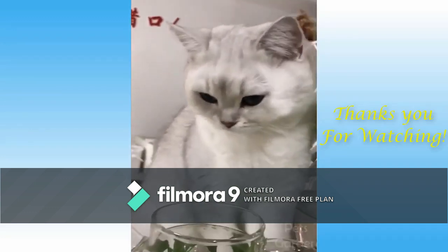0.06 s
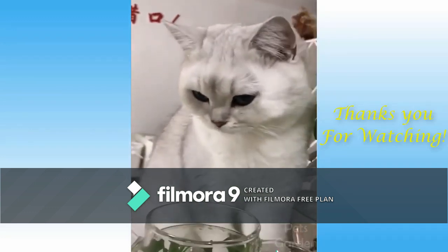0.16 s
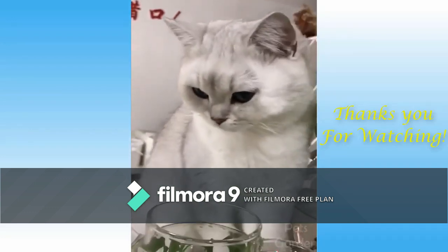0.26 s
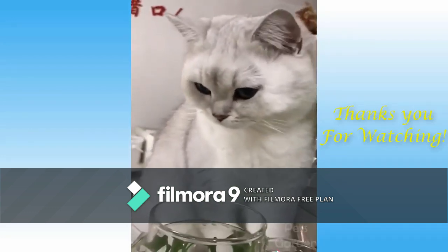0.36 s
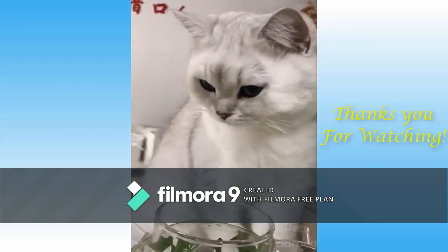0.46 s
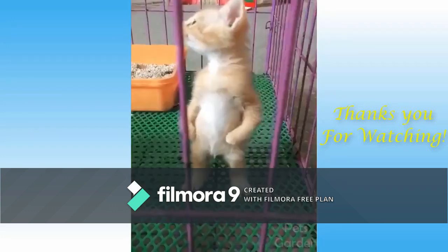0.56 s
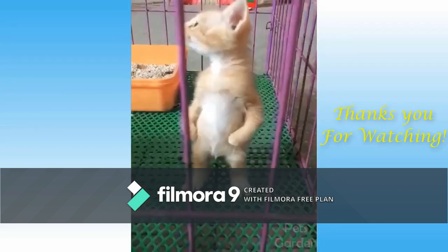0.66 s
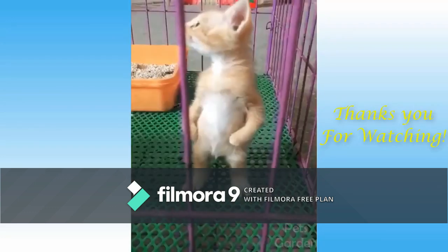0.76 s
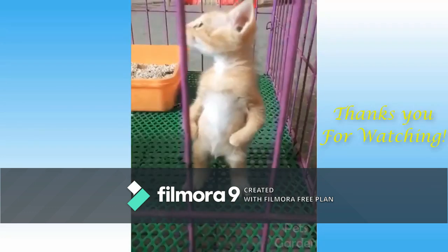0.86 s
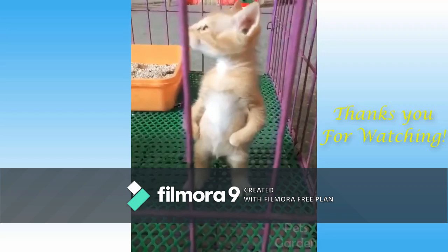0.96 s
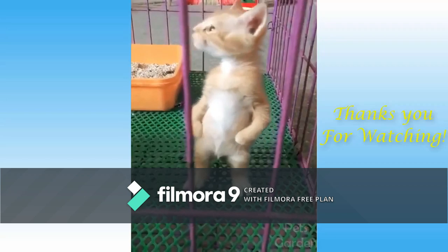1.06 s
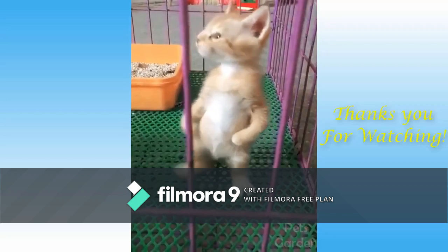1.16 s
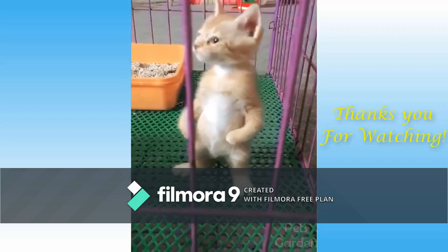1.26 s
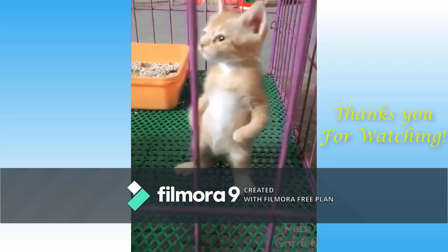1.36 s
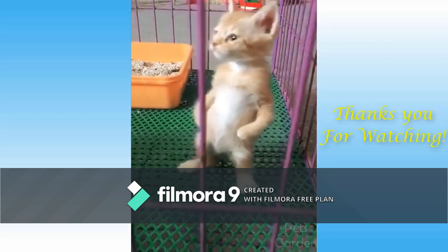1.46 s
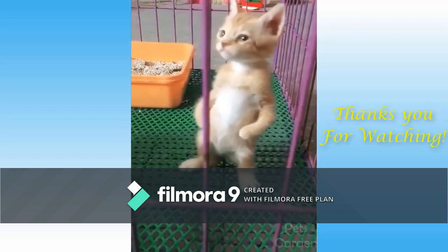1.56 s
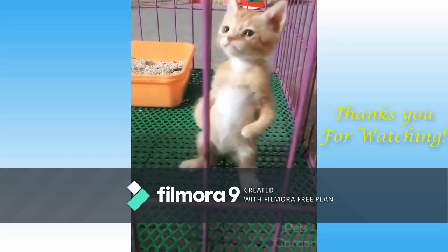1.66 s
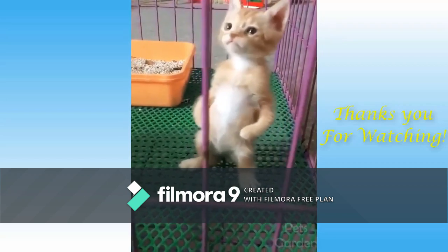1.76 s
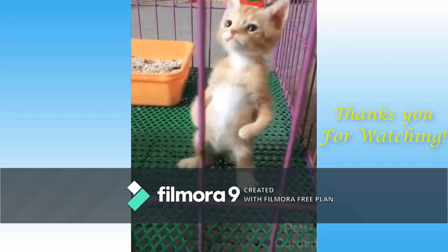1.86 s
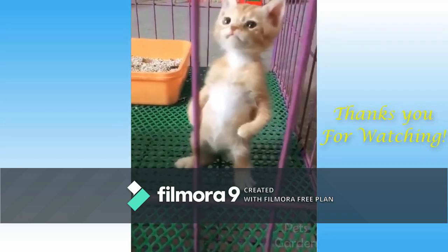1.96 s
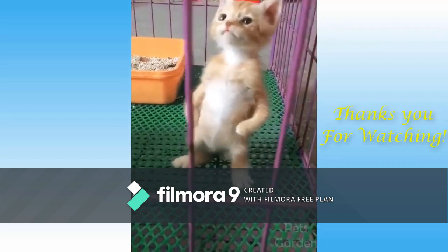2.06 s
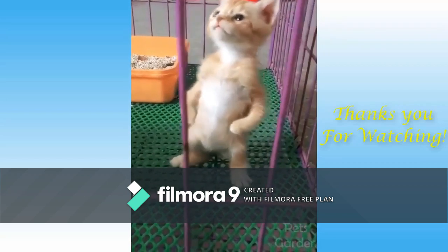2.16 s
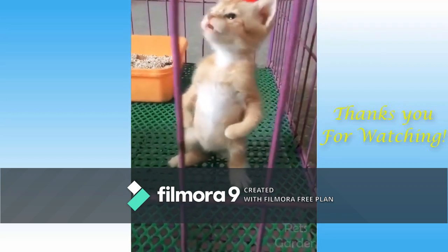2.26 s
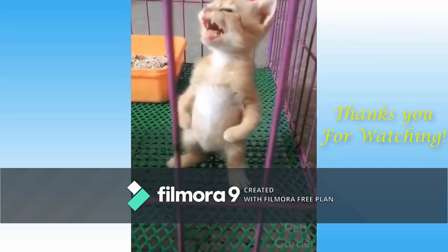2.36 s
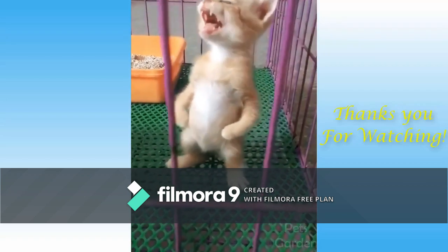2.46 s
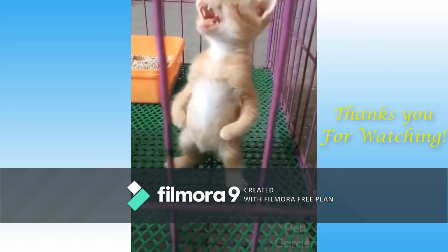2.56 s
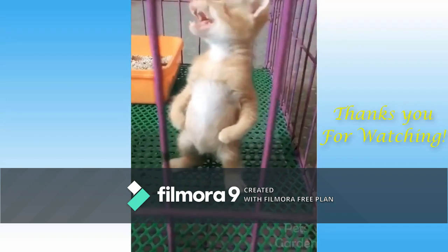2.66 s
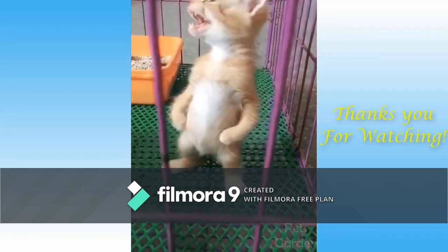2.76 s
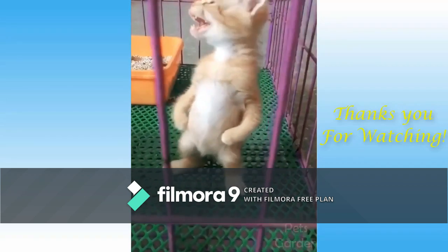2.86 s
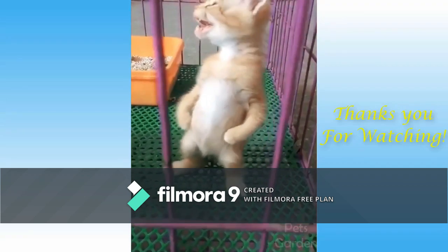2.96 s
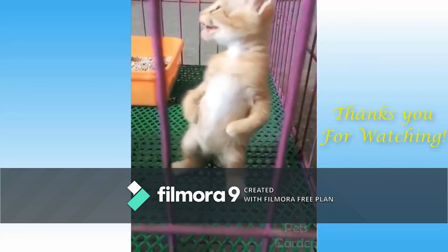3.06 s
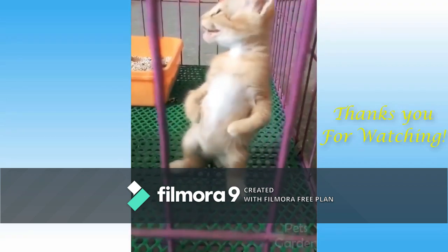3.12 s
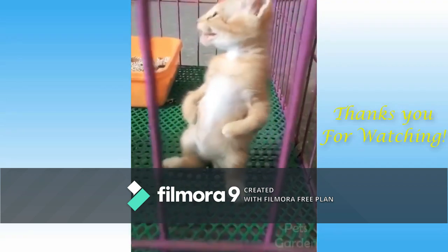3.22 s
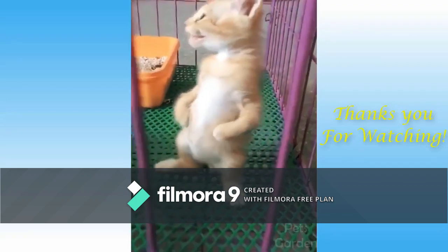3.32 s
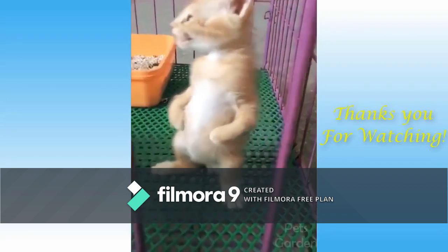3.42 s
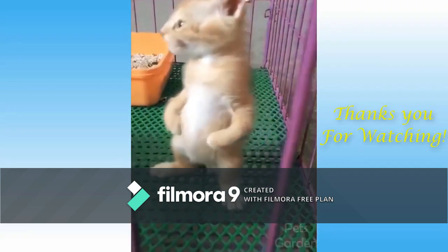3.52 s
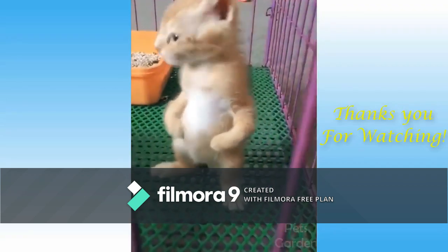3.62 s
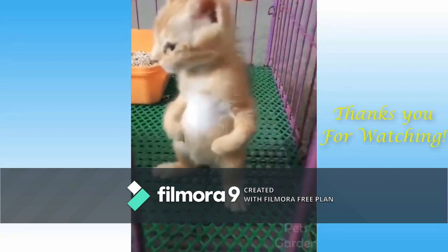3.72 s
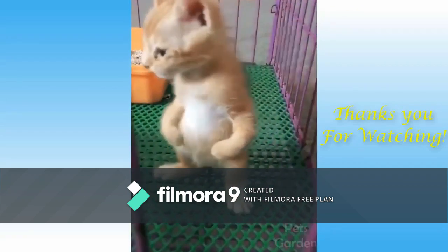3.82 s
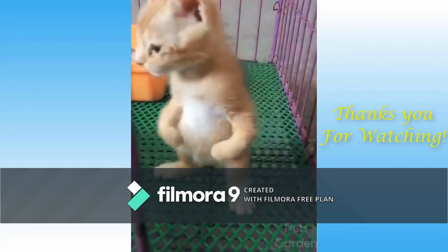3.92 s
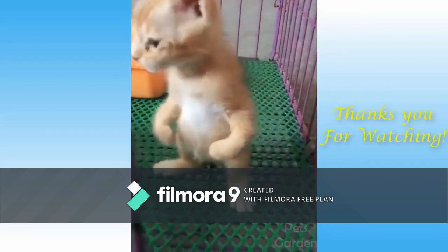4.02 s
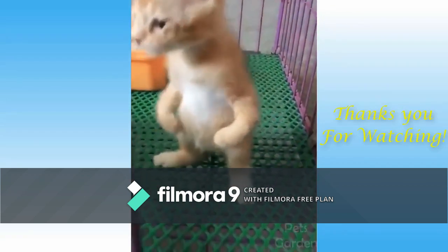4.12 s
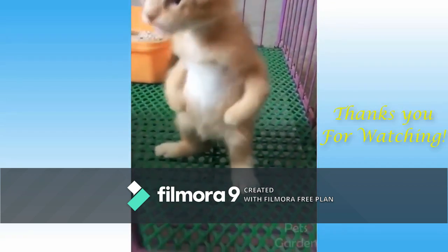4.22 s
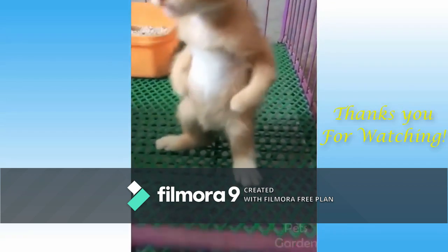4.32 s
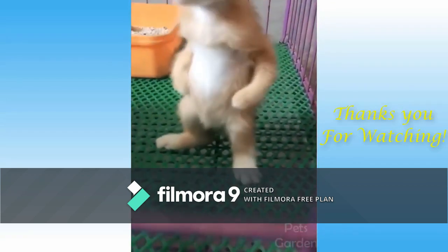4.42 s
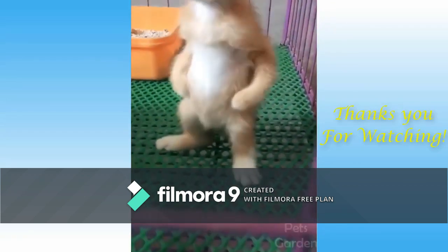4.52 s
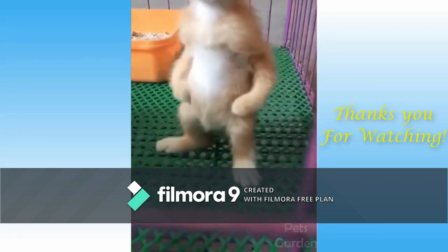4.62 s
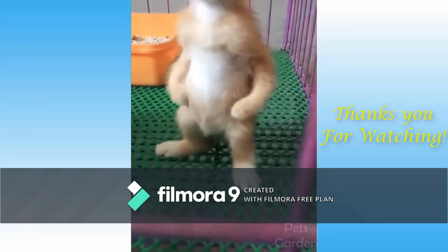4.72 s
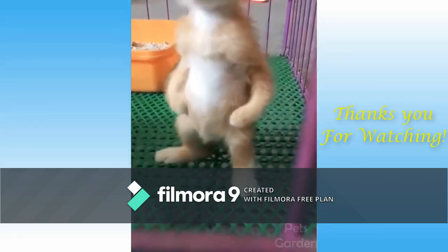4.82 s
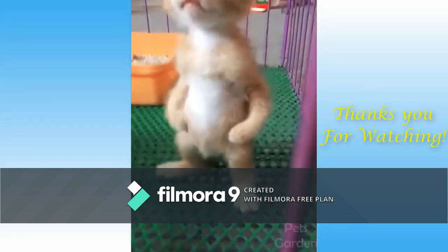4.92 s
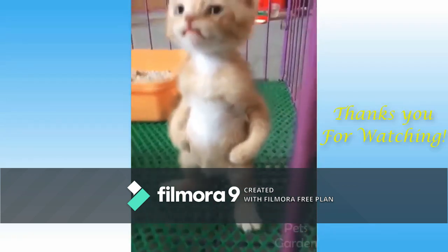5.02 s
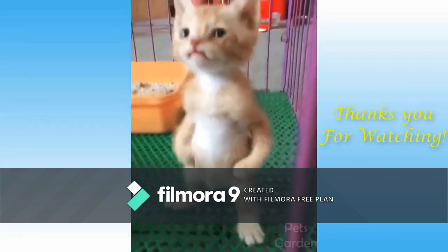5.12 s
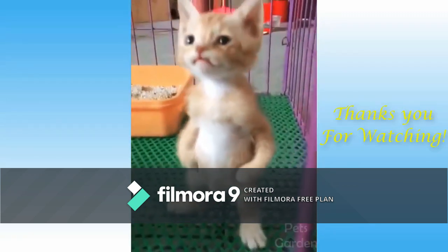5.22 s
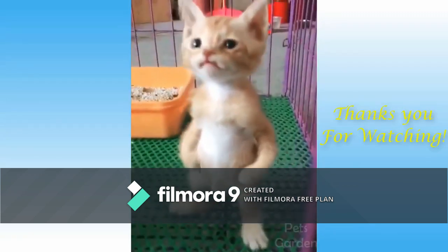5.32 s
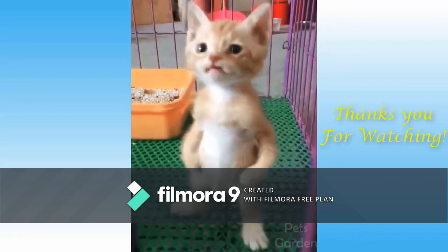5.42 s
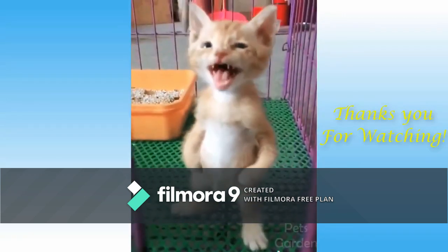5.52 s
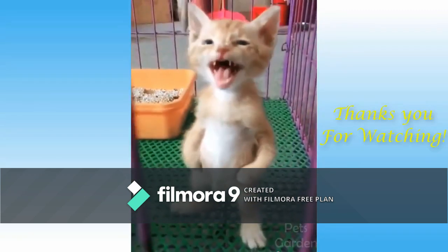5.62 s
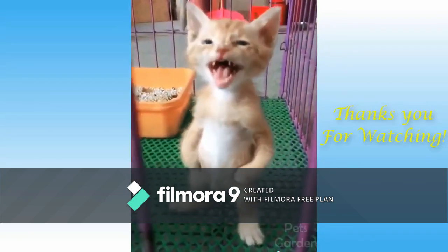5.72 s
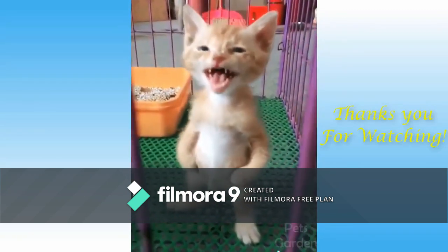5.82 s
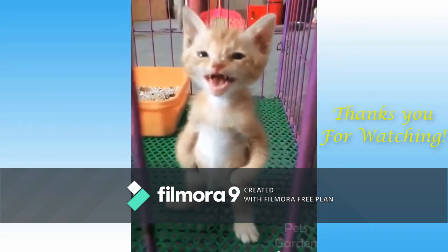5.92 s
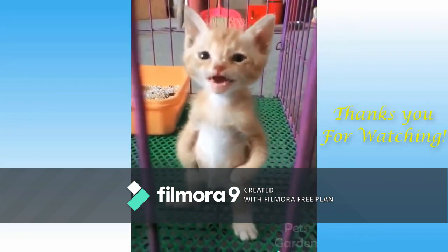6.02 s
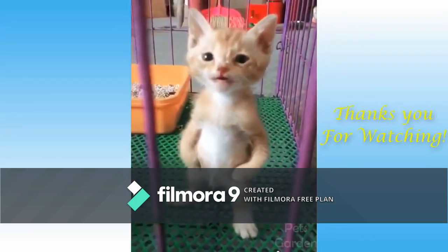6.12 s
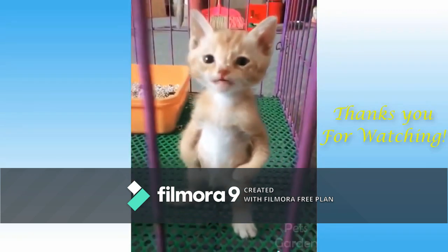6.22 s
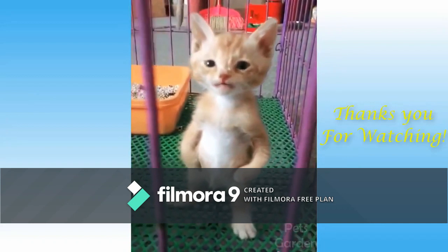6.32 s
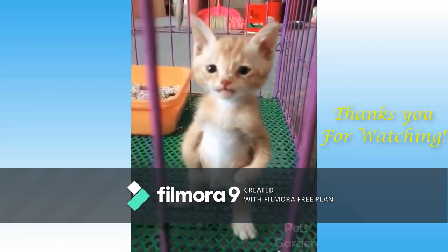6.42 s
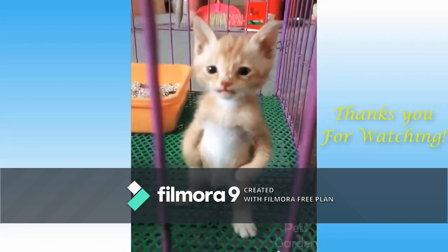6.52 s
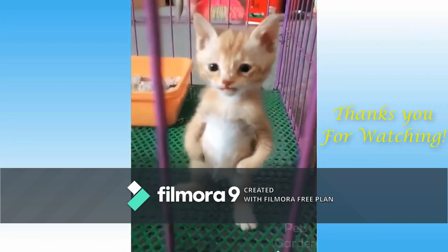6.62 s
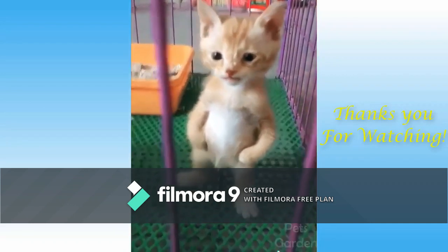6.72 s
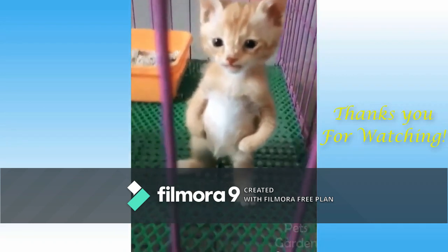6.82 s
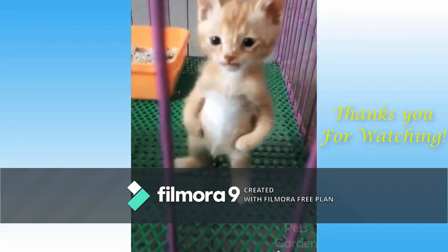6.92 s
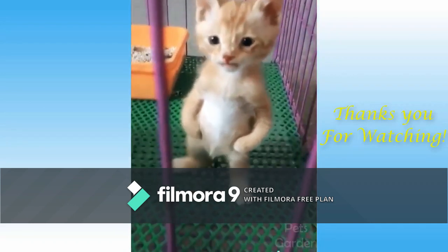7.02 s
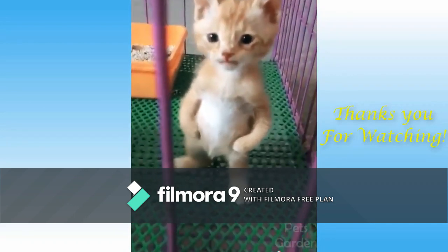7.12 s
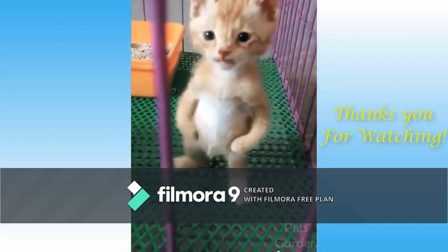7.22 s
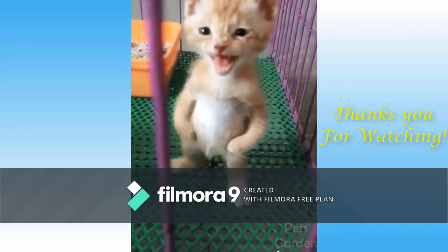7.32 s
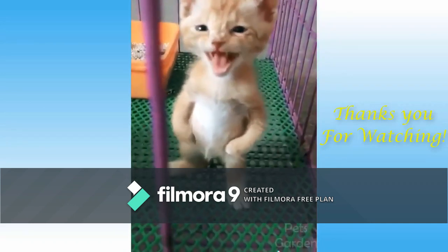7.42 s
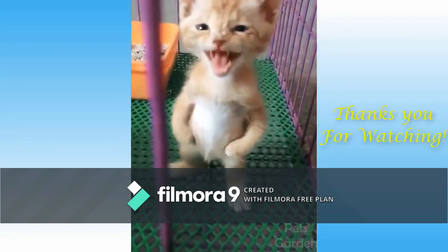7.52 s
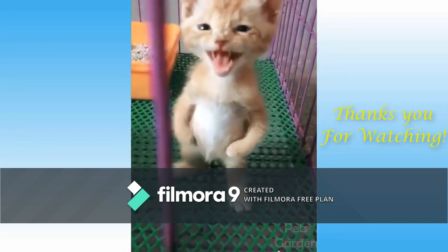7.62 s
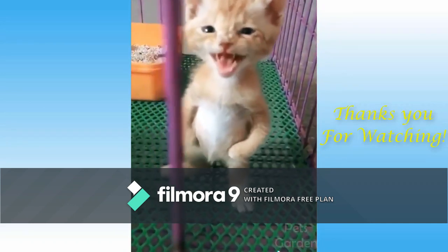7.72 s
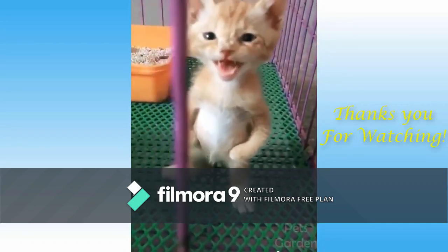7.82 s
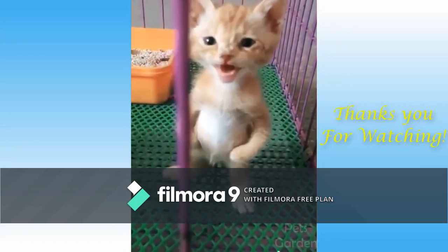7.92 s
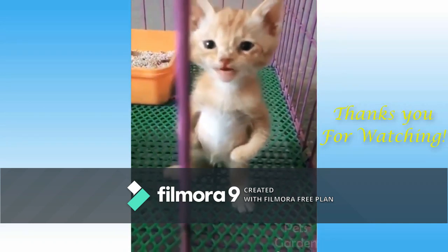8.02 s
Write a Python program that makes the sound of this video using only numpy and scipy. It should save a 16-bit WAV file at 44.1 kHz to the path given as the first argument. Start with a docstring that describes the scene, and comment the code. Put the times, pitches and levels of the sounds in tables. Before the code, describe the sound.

Close, fairly dry indoor sound, the same in both channels. After an opening gap of silence, machines hum and rumble low without stopping. A tiny kitten cries three times, thin and piercing: first a long falling meow, later two short, louder, raspier ones well apart. Barely audible paw scuffs and a tiny tick on a plastic mat fill the pauses.

```python
"""A room with a wire cage, mono microphone close to it: silence, then an abrupt opening onto three kitten meows.
Machines, perhaps fans, hum and rumble steadily: wandering tones over shaped noise.
Paws scuff softly on a plastic mat: short bells of grainy noise.
Each meow is an arch of pitch whose harmonics pass mouth and throat resonances, ringing near 4 kHz
while the mouth is wide; shaped noise makes it husky at its ends."""
import sys
import numpy as np
from scipy import signal
from scipy.fft import rfft, irfft
from scipy.io import wavfile
from scipy.ndimage import uniform_filter1d

SR = 44100
rng = np.random.default_rng(int(sys.argv[2]) if len(sys.argv) > 2 else 0)


def persist_wave(psi):
    """Save psi, clipped to +-1, as 16-bit WAV."""
    counts = np.round(np.clip(psi, -1, 1) * 32767).astype(np.int16)
    wavfile.write(sys.argv[1], SR, np.atleast_2d(counts).T)


N = 356019
TIME = np.arange(N) / SR
FREQS = np.fft.rfftfreq(N, 1 / SR)


def amp(db):
    """Decibels to gain."""
    return 10 ** (np.asarray(db) / 20)


def unit(x):
    """Scales to rms 1."""
    return x / np.sqrt(np.mean(x ** 2) + 1e-20)


def read_spectrum(points, hz):
    """A spectrum table joined by lines on a log-frequency axis."""
    point_hz, level_db = np.transpose(points)
    return np.interp(np.log(hz + 1), np.log(point_hz + 1), level_db)


def noise(spectrum_db):
    """Noise of rms 1 with the given spectrum."""
    white = rng.standard_normal(N)
    return unit(irfft(rfft(white) * amp(spectrum_db), N))


def drift(hz):
    """A random wander of rms 1, mostly slower than hz."""
    return noise(-10 * np.log10(1 + (FREQS / hz) ** 4))


def resonance(hz, centre_hz, width_hz):
    """Gain of a resonance, 1 at its centre and half at the edges of its width."""
    return 1 / (1 + ((hz - centre_hz) / width_hz * 2) ** 2)


def bell(t, centre_s, length_s):
    """A soft bump of height 1."""
    return np.exp(-2 * ((t - centre_s) / length_s) ** 2)


def bursts(rows):
    """Gain curve made of one soft bell a row."""
    return sum(amp(level_db) * bell(TIME, centre_s, length_s) for centre_s, length_s, level_db in rows)


# Relative colour of the room's rumble and air noise: frequency_hz, density_db [dB per Hz]
RUMBLE_SPECTRUM = [(30, -39), (40, 4.5), (60, 4.5), (130, -6.5), (160, 1), (270, -13), (430, -17.5),
                   (830, -18.5), (1100, -19.5), (2500, -38.5), (5000, -53), (9200, -57.5), (11600, -64.5),
                   (12800, -68)]
# Broad bumps and dips the room puts on that noise: centre_hz, width_hz, change_db
ROOM_BUMPS = [(15, 18, -16), (105.5, 41, 4.5), (185, 35, -1.5), (330, 73, 4), (1110, 230, 0),
              (3830, 500, 2)]
RUMBLE_DB = -28


def rumble(swell_db=0.96):
    """Low air noise of the room, coloured by broad bumps and swelling faintly."""
    bumps_db = sum(db * resonance(FREQS, centre, width) for centre, width, db in ROOM_BUMPS)
    colour_db = read_spectrum(RUMBLE_SPECTRUM, FREQS) + bumps_db
    return amp(RUMBLE_DB + swell_db * drift(hz=1.3)) * noise(colour_db)


# Steady motor tones, close neighbours beating together: frequency_hz, level_db [rms, before hum_db]
MOTOR_TONES = [(44.5, -43.7), (69.1, -40.7), (71.7, -41.1), (76.3, -35.4), (95.2, -34.8), (110.1, -39.1),
               (124.8, -49.0), (139.7, -48.7), (151.6, -41.1), (163.7, -43.2), (168.6, -35.5),
               (172.2, -37.7), (175.9, -37.6), (196.8, -47.4), (237.9, -44.6), (300.0, -50.5),
               (314.8, -49.9), (325.6, -52.4), (327.3, -49.0), (332.7, -49.7), (344.4, -44.9),
               (352.8, -55.6), (402.8, -55.0), (419.0, -55.6), (472.3, -56.5), (488.4, -60.0),
               (763.3, -57.3), (778.8, -51.1)]


def motors(hum_db=0.18, wander_rad=0.58):
    """Motor tones, each a sine wandering a little in phase."""
    hum = np.zeros(N)
    knots = np.linspace(0, TIME[-1], num=12)
    for hz, level_db in MOTOR_TONES:
        sway = wander_rad * np.interp(TIME, knots, rng.standard_normal(len(knots)))
        start_turn = rng.random()
        hum += np.sqrt(2) * amp(level_db) * np.cos(2 * np.pi * (hz * TIME + start_turn) + sway)
    return amp(hum_db) * hum


# Soft scuffs of paws on the plastic mat: centre_s, length_s, level_db
PAW_SCUFFS = [(1.05, 0.043, -64), (1.3, 0.051, -64), (2.18, .16, -72), (3.823, 0.009, -52),
              (4.795, 0.0072, -60), (5.0, 0.049, -64)]
# Relative colour of the scuffs: frequency_hz, density_db [dB per Hz]
MAT_SPECTRUM = [(1000, -29), (2800, 0), (3900, 11), (5000, 6), (6500, -1), (9000, -3), (12000, -8),
                (13000, -38)]


def paws():
    """Scuffs on the mat, noise made grainy by fast random changes of level."""
    grain = amp(3 * drift(hz=200))
    scuffing = unit(noise(read_spectrum(MAT_SPECTRUM, FREQS)) * grain)
    return bursts(PAW_SCUFFS) * scuffing


# Reflections from walls and floor near the cage: delay_s, gain [linear, signed]
NEAR_ECHOES = [(.0023, 0.012), (.0061, -0.1), (0.0085, .06)]
ROOM_T60_S = .3


def room(x, wet_db=-19):
    """A few near reflections and a faint short tail of decaying noise."""
    t = TIME[:SR // 2]
    tail = rng.standard_normal(len(t)) * amp(-60 * t / ROOM_T60_S) * (t > .008)
    response = amp(wet_db) * unit(tail) / np.sqrt(len(t))
    response[0] = 1  # direct sound
    for delay_s, gain in NEAR_ECHOES:
        response[round(delay_s * SR)] += gain
    return signal.fftconvolve(x, response)[:N]


# a fixed hollow in the voice
HOLLOW_HZ, HOLLOW_WIDTH_HZ, HOLLOW_DB = 3428, 380, -5.5
MOUTH_WIDTH_HZ, MOUTH_TOP_HZ = 716, 4500


def mouth_gain(harmonic_hz, mouth_hz):
    """The mouth resonance, hollowed near 3.4 kHz; an overtone flares as it crosses it."""
    hollow = amp(HOLLOW_DB * resonance(harmonic_hz, HOLLOW_HZ, HOLLOW_WIDTH_HZ))
    mouth = resonance(harmonic_hz, mouth_hz, MOUTH_WIDTH_HZ) * hollow
    return mouth / (1 + (harmonic_hz / MOUTH_TOP_HZ) ** 20)


# Upper throat resonances: centre_hz [before the mouth's shift], width_hz, level_db [relative]
THROAT_RESONANCES = [(4760, 570, -10.5), (5827, 365, 5.5), (6970, 520, -0.5), (8270, 750, -1.5),
                     (9370, 700, 0), (12100, 750, -15.5)]


def throat_gain(harmonic_hz, top_hz, shift, dull_db):
    """Throat resonances moved by the mouth's shape and dulled above top_hz."""
    throat = sum(amp(level_db) * resonance(harmonic_hz, centre_hz * shift, width_hz)
                 for centre_hz, width_hz, level_db in THROAT_RESONANCES)
    above_top = 1 - 1 / (1 + (harmonic_hz / top_hz) ** 36)
    return throat * amp(dull_db * above_top)


# The mouth's shape in every meow, opening and then closing, which dulls the voice:
# share of the meow, mouth_hz [resonance], top_hz [of the overtones], shift [factor on throat centres]
MOUTH_SHAPE = [(0, 3790, 6500, 1.04), (.11, 4160, 9120, 1.014), (.25, 4130, 9900, 1.191),
               (0.551, 3603, 9900, 0.997), (.82, 3300, 8600, 1), (1, 3194, 6560, 1.04)]
EBB_DB_PER_S = 15  # the effort ebbs as the air runs out
ATTACK_S, RELEASE_S = 0.014, 0.038
# the bright edge swells in, and takes a share of the push a little ahead of it
EDGE_RISE_S, EDGE_SHARE, EDGE_LEAD_S = 0.035, 0.52, 0.051
# the folds are unsteady while they start and stop, and leak more air as the meow dies
ROUGH_START_S, ROUGH_END_S, ROUGH_GAIN = 0.14, 0.093, 4.54
HUSKY_END_S, HUSKY_END_DB = 0.43, 24
RING_RISE_S = 0.033  # the mouth starts to ring a moment after the voice sets in
# the fundamental starts weak and fills out; the octave fades at low pitch
FUNDAMENTAL_DB, FUNDAMENTAL_START_DB, FILL_S = -30, -4, 0.23
OCTAVE_DB, OCTAVE_LOW_HZ = -31, 1910
# below a weak effort the octave drains away, by DRAIN dB for each dB of effort
WEAK_DB, DRAIN = -35, 0.72
# random level waver: knot spacing, then depth for the throat's and the two lowest harmonics
WAVER_S, HIGH_WAVER_DB, LOW_WAVER_DB = .035, 3.5, 1.6


def meow(pitch, effort, jitter, shimmer, husky_noise, dull_db=-18, husk_db=-29, leak_db=-45):
    """The harmonics of the vocal folds glide through the mouth and throat resonances."""
    push_s, push_length_s, push_db, held_db, edge_db = effort
    start, end = pitch[0][0], pitch[-1][0]
    on = (TIME >= start) & (TIME <= end)
    t, left = TIME[on] - start, end - TIME[on]

    rough = 1 + ROUGH_GAIN * (bell(t, 0, ROUGH_START_S) + bell(left, 0, ROUGH_END_S))
    arch_hz = uniform_filter1d(np.interp(TIME[on], *np.transpose(pitch)), size=800)
    hz = arch_hz * (1 + rough * jitter[on])
    phase = 2 * np.pi * np.cumsum(hz) / SR

    ebb_db = EBB_DB_PER_S * t
    ring_db = held_db - ebb_db + push_db * bell(t, push_s, push_length_s)
    ring = amp(ring_db) * np.minimum(t / RING_RISE_S, 1) ** 2
    edge_push_db = EDGE_SHARE * push_db * bell(t, push_s - EDGE_LEAD_S, push_length_s)
    edge = amp(edge_db - ebb_db + edge_push_db) * np.minimum(t / EDGE_RISE_S, 1) ** 2

    fundamental = amp(FUNDAMENTAL_DB + FUNDAMENTAL_START_DB * np.exp(-t / FILL_S))
    octave = amp(OCTAVE_DB + DRAIN * np.minimum(ring_db - WEAK_DB, 0))
    octave = octave / (1 + (OCTAVE_LOW_HZ / (2 * hz)) ** 24)

    shares, *shape = np.transpose(MOUTH_SHAPE)
    mouth_hz, top_hz, shift = (np.interp(t / (end - start), shares, column) for column in shape)
    k = np.arange(3, 14)[:, None]  # harmonic numbers above the octave
    mouth = mouth_gain(k * hz, mouth_hz)
    throat = throat_gain(k * hz, top_hz, shift, dull_db) * (k > 3)

    knots = np.arange(0, TIME[-1], WAVER_S)
    steps = rng.standard_normal((len(k) + 2, len(knots)))
    waver = np.array([np.interp(t, knots, row) for row in steps])
    throat = throat * amp(HIGH_WAVER_DB * waver[2:])
    # the throat spreads the edge over the harmonics without changing its total
    overtones = ring * mouth + edge * throat / np.linalg.norm(throat, axis=0)

    tone = fundamental * amp(LOW_WAVER_DB * waver[0]) * np.cos(phase)
    tone += octave * amp(LOW_WAVER_DB * waver[1]) * np.cos(2 * phase)
    tone += (overtones * np.cos(k * phase)).sum(0)
    tone = np.sqrt(2) * tone * (1 + rough * shimmer[on])

    # air escapes each time the folds open, more when the voice is pressed
    pressed = amp(husk_db + HUSKY_END_DB * bell(left, 0, HUSKY_END_S)) * edge
    leak = amp(leak_db + FUNDAMENTAL_DB)
    husk = husky_noise[on] * (1 + np.cos(phase)) * (pressed + leak)

    out = np.zeros(N)
    out[on] = (tone + husk) * np.minimum(t / ATTACK_S, 1) * np.minimum(left / RELEASE_S, 1)
    # air escapes as the voice breaks in, and again once it stops: centre_s, length_s, level_db
    return out + husky_noise * bursts([(start + 0.023, 0.028, -44), (end + 0.01, 0.038, -49)])


# One arch of pitch a meow, from first sound to last: time_s, pitch_hz
PITCH_ARCHES = [
    [(2.39, 966), (2.408, 965), (2.438, 1138), (2.484, 1273), (2.594, 1396), (2.68, 1382), (2.78, 1282),
     (2.966, 1193), (3.35, 1093), (3.53, 1036), (3.62, 943), (3.66, 825)],
    [(5.58, 870), (5.638, 1144), (5.695, 1320), (5.77, 1372), (5.86, 1359), (5.93, 1294), (6.004, 1210),
     (6.098, 1093), (6.156, 954), (6.215, 997)],
    [(7.39, 862), (7.418, 912), (7.46, 1152), (7.53, 1278), (7.59, 1327), (7.678, 1320), (7.778, 1224),
     (7.872, 1164), (7.98, 1060), (8.07, 906)],
]
# Effort of each meow, with one hard push early on:
# push_s [after the start], push_length_s, push_db, held_db [at the start, before the push],
# edge_db [bright edge, likewise]
MEOW_EFFORTS = [(0.173, 0.14, 15, -29.5, -41), (0.182, 0.21, 18.5, -26, -36), (.22, .16, 10.5, -21.5, -35)]
# Rasps of husky noise as the voice cracks: centre_s, length_s, level_db
VOICE_RASPS = [(2.52, .05, -60), (5.682, 0.033, -42.5), (5.778, 0.027, -49), (7.476, 0.038, -43),
               (7.6, 0.012, -46.5)]
# Relative colour of the husky noise, strongest near 5.9 kHz: frequency_hz, density_db [dB per Hz]
HUSK_SPECTRUM = [(500, -47), (2000, -16), (3000, -9.5), (4000, -11), (5000, -15), (5900, 0), (7300, -16.5),
                 (9000, -13.5), (10500, -12), (12100, -13.5), (12800, -31)]


def kitten(ragged_db=3.0):
    """Three meows from slightly unsteady folds, with a ragged rasp of air where they do not close."""
    jitter = .0018 * drift(hz=55) + .001 * drift(hz=180)  # share of the pitch
    shimmer = .055 * drift(hz=60)  # share of the level
    husky_noise = unit(noise(read_spectrum(HUSK_SPECTRUM, FREQS)) * amp(ragged_db * drift(hz=90.3)))
    meows = sum(meow(pitch, effort, jitter, shimmer, husky_noise)
                for pitch, effort in zip(PITCH_ARCHES, MEOW_EFFORTS))
    return meows + husky_noise * bursts(VOICE_RASPS)


def scene():
    """Machines, paws and kitten, the same in both channels; only paws and kitten get the room's echoes."""
    mono = rumble() + motors() + room(paws() + kitten())
    return np.array([mono, mono])


START_S, EDGE_HZ = .679, 12700


def record(dry):
    """The microphone opens abruptly at START_S; then a low-pass at EDGE_HZ."""
    opened = dry * (TIME >= START_S)
    low_pass = signal.firwin(401, EDGE_HZ, window=("kaiser", 9), fs=SR)
    return signal.oaconvolve(opened, low_pass[None], "same")


dry = scene()
out = record(dry)
persist_wave(out)
```